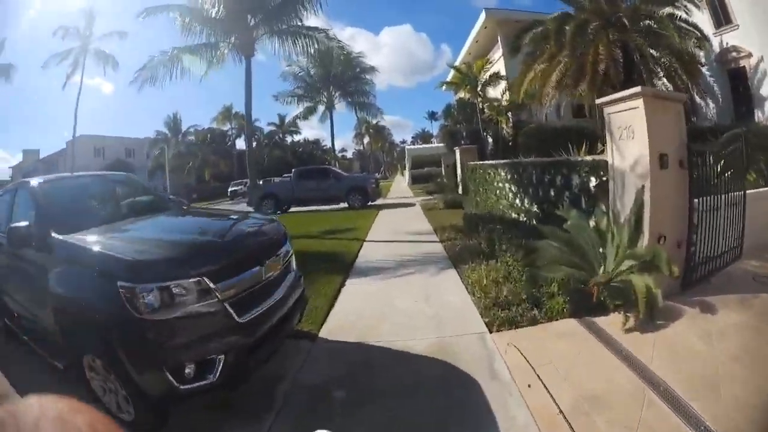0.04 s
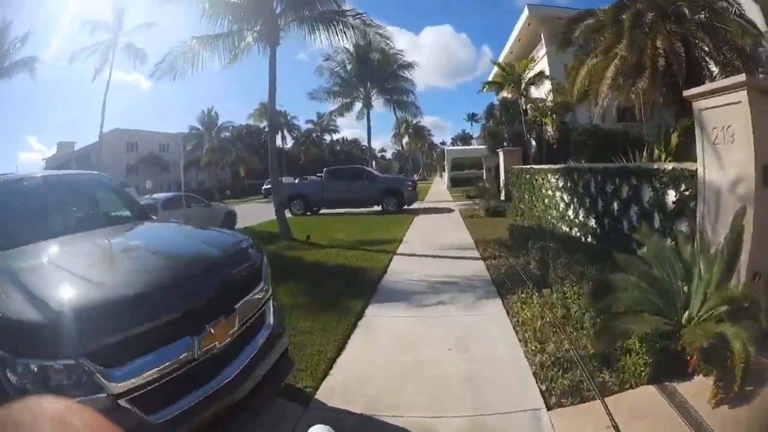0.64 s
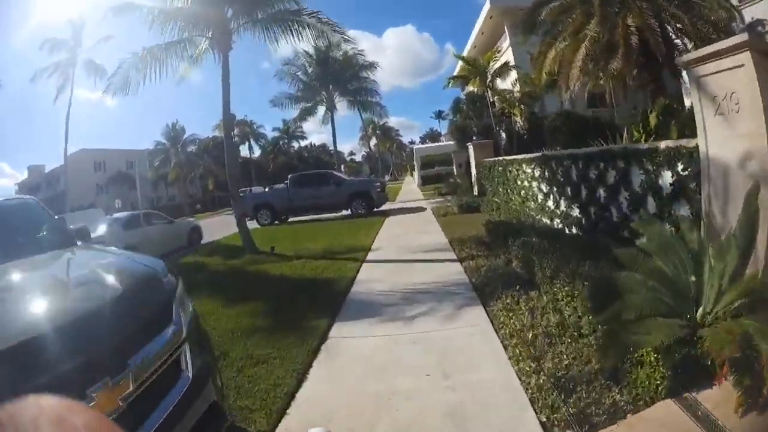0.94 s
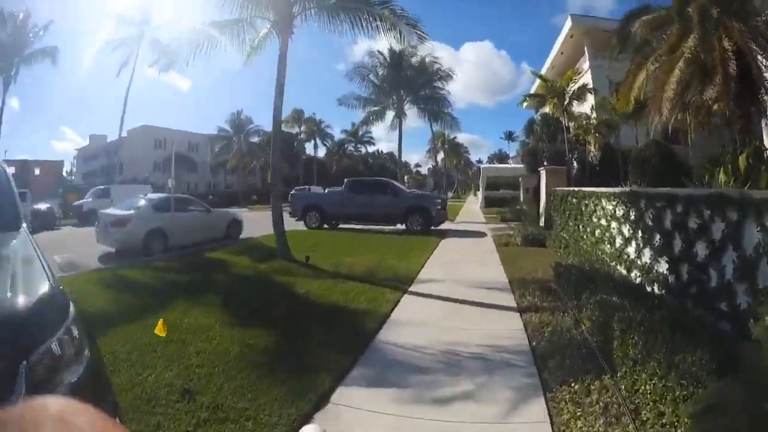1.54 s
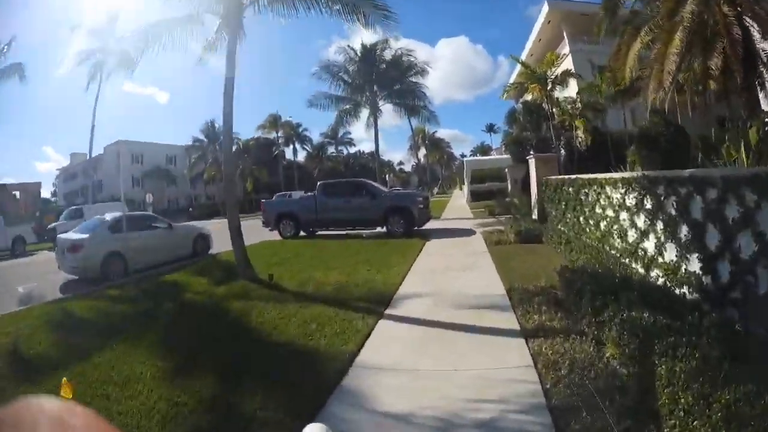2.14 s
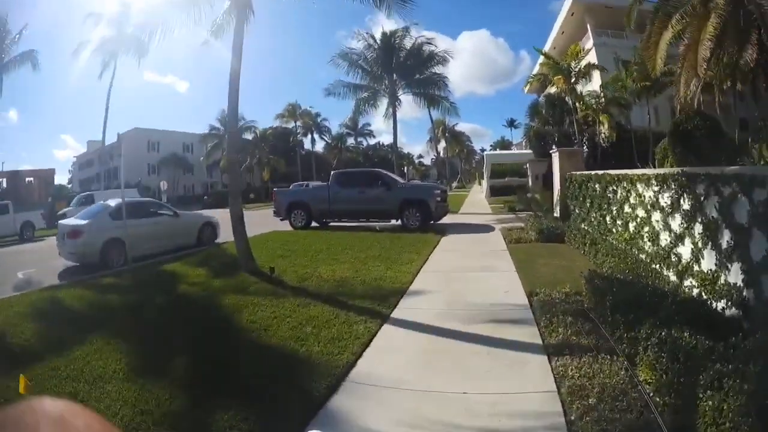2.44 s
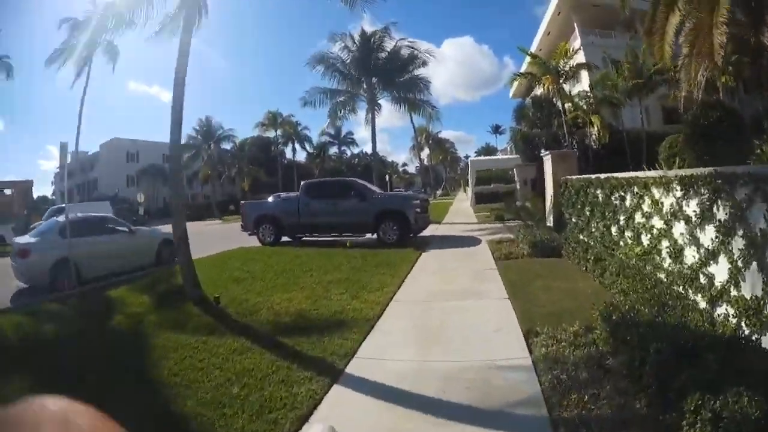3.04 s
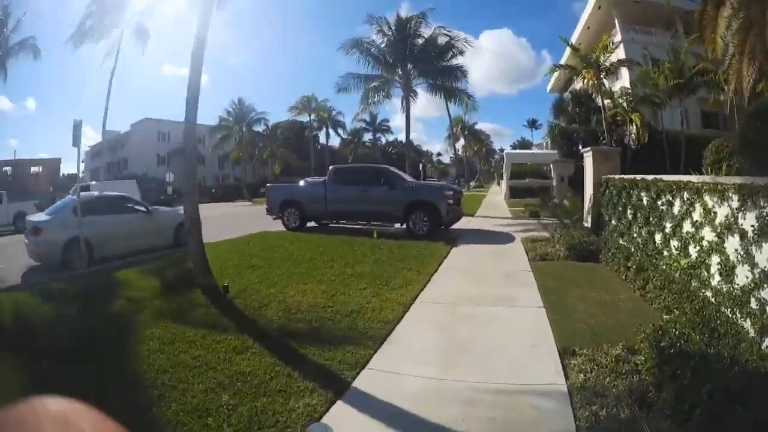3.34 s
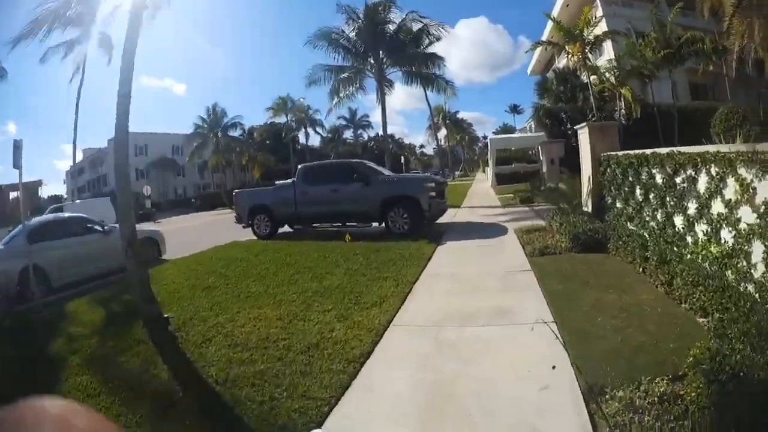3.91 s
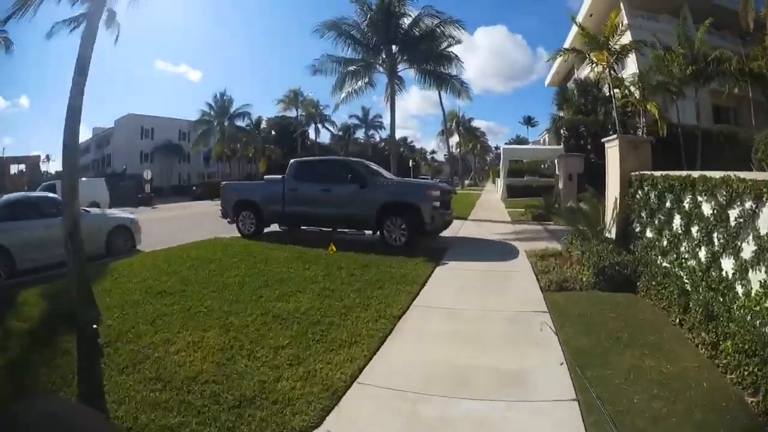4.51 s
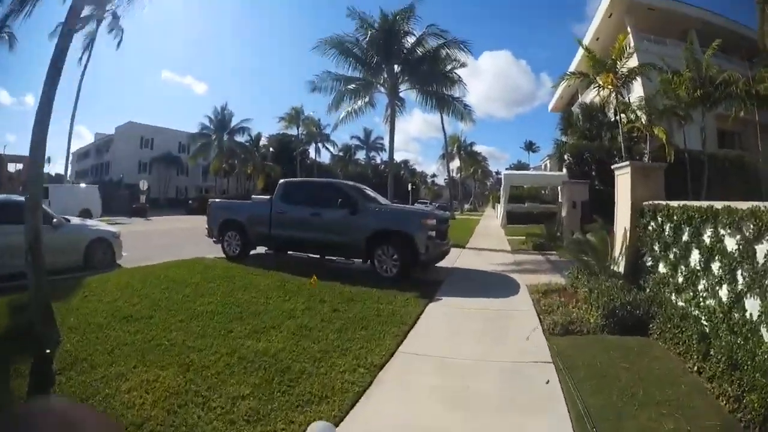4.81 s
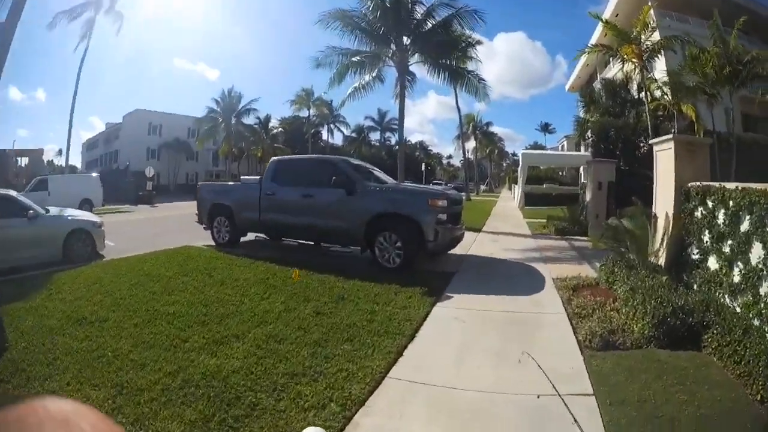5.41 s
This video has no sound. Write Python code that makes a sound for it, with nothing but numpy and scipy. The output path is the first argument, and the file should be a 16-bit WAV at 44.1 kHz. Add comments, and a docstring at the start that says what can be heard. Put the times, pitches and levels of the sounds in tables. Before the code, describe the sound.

Someone walks along a quiet sidewalk while a hanging piece of gear knocks unevenly against the camera, each tap short, hollow and very close. Small hard fittings click and bounce, and a strap swishes briefly. Three soft footfalls thump early on, and a finger creaks faintly on the housing around the middle. Faint outdoor air and microphone hiss lie underneath, with no echo.

```python
"""A hanging piece of gear knocks on a camera body as someone walks along a quiet pavement.
Each knock makes the hollow body ring briefly, and three footfalls thump softly. Small hard
fittings click and bounce, edges snap past each other, a finger sticks and slips on the housing,
and a strap swishes as it slides.
Behind it all are faint outdoor air, microphone hiss and a low hum that soon dies away."""
import sys
import numpy as np
from scipy import signal
from scipy.fft import rfft, irfft, next_fast_len
from scipy.io import wavfile
from scipy.ndimage import uniform_filter1d

SR = 44100
rng = np.random.default_rng(int(sys.argv[2]) if len(sys.argv) > 2 else 0)


def dump(signal):
    """Clip the signal to [-1, 1] and save it as 16-bit WAV at the path in sys.argv[1]."""
    limited = np.clip(np.atleast_2d(signal).T, -1, 1)
    pcm = np.round(limited * 32767).astype(np.int16)
    wavfile.write(sys.argv[1], SR, pcm)


N = 249694
TIME = np.arange(N) / SR
AGE = np.arange(int(SR / 8)) / SR  # seconds since a blow

# Knocks on the camera, and three soft, low footfall thumps (the rows with long contact).
# Each row: start in seconds, level in dB, contact time in milliseconds,
# extra dB for the hollow tones, extra dB for the wall tones.
BLOWS = [(0.0023, -12.5, 0.25, -5, -1), (0.0893, -13.5, 0.77, 3.5, -3), (0.4321, -12, 0.53, 3.5, 0),
         (0.496, -4, .12, -4, 1), (0.574, -4.5, 0.17, 4.5, 0.5), (0.692, -11, 4.5, 0, 8),
         (1.0735, -2, 0.11, 3, 0.5), (1.506, -12, 5, -2, 15), (1.703, -11, 3.6, 0, 0),
         (2.088, -3.5, 0.31, -1, 0), (2.27, -14.5, 0.53, -0.5, -4), (2.449, -17, 1.13, 2.5, 0.5),
         (2.589, -4, 0.8, 0.5, -2.5), (3.1096, -6.5, 1.18, 2, 0.5), (3.242, -10, 1.23, -1, 0.5),
         (3.5215, -11.5, 1.05, -3, -0.5), (3.5901, -19.5, 1.06, 3, 0), (3.7126, -11, 0.53, 2.5, -1),
         (4.125, -11.5, 0.43, 3.5, -1), (4.2428, -9.5, 0.53, 0.5, -1.5), (4.405, -14, 0.81, 3, -7),
         (4.5552, -7, 0.48, -1, -0.5), (4.623, -16, 0.69, 4, 0), (4.7333, -7, 0.19, 3, -0.5),
         (5.0688, -2.5, 0.16, 0, 0.5), (5.134, -6, 0.25, 4.5, 0), (5.2332, -8.5, 0.6, 3, -2)]
# The tones the body rings with. Each row: pitch in Hz, t60 (seconds to fade by 60 dB), dB at the
# left microphone, dB at the right, direction of the first swing (+1 or -1) on the left, on the right.
BODY_TONES = [(64.7, 0.14, -47, -57, -1, 1), (150, 0.11, -51.5, -54, -1, -1),
              (191, 0.09, -44, -53.5, -1, -1), (248, 0.024, -32.5, -46, -1, -1),
              (432.7, 0.047, -28.5, -22.5, -1, 1), (458.4, 0.02, -21, -31, 1, -1),
              (557, 0.044, -43, -31.5, 1, -1), (790, 0.031, -33.5, -45, -1, -1),
              (1176.6, 0.028, -19.5, -25, 1, 1), (1426, 0.017, -15.5, -26.5, -1, -1),
              (1535, 0.029, -18, -37, 1, -1), (1876, 0.044, -38.5, -33.5, -1, -1),
              (1970, 0.036, -18.5, -68, -1, -1), (2230, 0.016, -32, -30, 1, 1),
              (3500, 0.0029, -19.5, -33.5, 1, -1), (4390, 0.0081, -27, -53, -1, -1)]
def knocks_and_footfalls(detune=0.011, grip=0.18, stiffening=0.035, hollow_hz=440, wall_hz=1200,
                         travel_s=0.0001, crossing_s=0.001, damping_hz=6000):
    """Each blow rings the same body tones; a soft, long contact leaves the high ones quiet."""
    out = np.zeros((2, N))
    hz, t60, left_db, right_db, left_swing, right_swing = np.transpose(BODY_TONES)
    # low waves travel more slowly, and all must cross the body to reach the right microphone
    arrival = travel_s * np.sqrt(1000 / hz)
    hollow = np.abs(np.log2(hz / hollow_hz)) < .5
    wall = np.abs(np.log2(hz / wall_hz)) < .5
    for start, db, contact_ms, hollow_db, wall_db in BLOWS:
        scatter_db, pitch_luck, grip_luck = rng.standard_normal((3, len(hz)))
        # the grip shifts, so each tone fades a little differently from blow to blow
        fade = t60 * (1 + grip * np.tanh(grip_luck))
        push = undb(db + hollow_db * hollow + wall_db * wall + scatter_db) * contact(hz, contact_ms)
        # a harder blow raises the pitch of the low tones a little
        rise = np.where(hz < 2 * hollow_hz, 1 + stiffening * undb(db), 1)
        pitch = hz * rise * (1 + detune * pitch_luck)
        left = (push * np.sign(left_swing) * undb(left_db)) @ ring(pitch, fade, arrival)
        right = (push * np.sign(right_swing) * undb(right_db)) @ ring(pitch, fade, arrival + crossing_s)
        add(out, np.array([left, right]) + rattle(db, contact_ms), start)
    # the plastic shell swallows the treble
    return signal.sosfilt(signal.butter(6, damping_hz, fs=SR, output="sos"), out)


def contact(hz, contact_ms):
    """How much of a blow reaches a pitch: the longer the touch, the less treble."""
    return 1 / np.sqrt(1 + (hz * contact_ms / 1000) ** 4)


def rattle(db, contact_ms, chatter_hz=560, tick_ms=0.04):
    """After a blow, loose parts buzz and the mount chatters; a brief, hard contact also ticks."""
    # the buzz borrows the strap's tone colour, and the chatter that of a skin snap
    buzz = colour(rng.standard_normal((2, len(AGE))), STRAP_COLOUR) * decay(db - 45, t60=0.12)
    chatter = colour(rng.standard_normal((2, len(AGE))), np.array(SNAP_COLOUR) * [chatter_hz, 1])
    chatter *= decay(db - 44, t60=0.13) * contact(chatter_hz, contact_ms)
    tick = rng.standard_normal((2, len(AGE))) * decay(db - 33, t60=0.0025)
    return buzz + chatter + tick / (1 + (contact_ms / tick_ms) ** 2)


# Clicks of the fittings. Each row: start in seconds, level in dB, the piece's own note in Hz,
# extra dB for that note, extra dB for the crack, left minus right in dB, the crack's t60 in seconds.
CLICKS = [(0.0107, -35, 1250, 1, -1.5, -2, 0.011), (0.016, -40.5, 1740, 6, -5, 2, .015),
          (0.031, -38.5, 1660, -3, -8, 0, 0.023), (0.514, -40, 1440, -4, -8, 8, .017),
          (0.691, -47, 1520, -2, 9, 3, .012), (1.1736, -34.5, 2050, 2.5, -0.5, 3, 0.02),
          (1.5925, -50, 2060, -2, 3, 1, .01), (1.6068, -38.5, 2025, 9.5, 0, 1, .011),
          (1.7038, -48.5, 2070, 10, 16.5, 4, .007), (1.7275, -47.5, 1390, 1, 8, -2, 0.013),
          (2.0155, -42, 2050, 7, 3, -3, 0.0095), (2.0342, -37.5, 980, -8.5, 2, 1, 0.015),
          (2.039, -42.5, 2110, 1, 6, 1, 0.019), (2.1882, -39.5, 1966, 17.5, 8, -3, .018),
          (2.1897, -39.5, 2150, 11, 8, 2, .016), (2.1939, -35.5, 3500, 15, 18, 6, 0.0098),
          (2.202, -36.5, 1530, -11, -1, -4, .014), (2.206, -46.5, 3560, 19, 11, 10, .008),
          (2.254, -48, 1900, 0, 5, 3, 0.038), (2.5852, -43, 1880, 0, 4, 4, .014),
          (2.72, -43.5, 1030, -2, -16, 2, .017), (3.012, -46, 1960, 5, -14, 2, .017),
          (3.031, -49, 2050, -2, -2, 0, .02), (3.2, -41.5, 1970, 8, 1, 0, 0.012),
          (3.2103, -41, 1050, -9, 8, 3, 0.0072), (3.6253, -48.5, 3520, 7, 6, 1, .01),
          (4.0808, -47, 2070, 11.5, -15, 0, .017), (4.405, -41.5, 922, 11, 4, -3.5, 0.011),
          (4.4087, -38.5, 1500, 5, 6, 1, 0.013), (4.4735, -39.5, 900, -0.5, 0, -3, 0.013),
          (4.479, -45, 2100, -1, 4, 0, 0.012), (4.791, -47, 1080, 1, -8, -4, 0.015),
          (4.939, -49.5, 2060, 8, -9, 4, .017), (5.0813, -40, 1920, 5, 1, 0, 0.0052),
          (5.2473, -38, 3740, 7, 3, 8, .009), (5.277, -49, 1570, 0, 3, 3, 0.018),
          (5.2835, -45, 2440, -6, 6, 1, .012), (5.305, -54, 1490, -5, 0, 1, .017),
          (5.575, -49, 1460, 5, -13, -2, 0.019), (5.627, -45.5, 2920, 5, -2, -2, 0.011)]
# How well small parts send sound to the microphones. Each row: frequency in Hz, level in dB.
CLICK_COLOUR = [(100, -1), (450, 5.5), (900, 3), (2000, 3), (3800, 4.5), (6000, 1.5), (7000, -20.5),
                (7900, -50), (10500, -8), (15000, -19)]
def clicks(bounce_s=0.0083, bounce_db=-11, faint_count=8, faint_db=-52, faint_hz=2200, gain_db=-5):
    """Each listed fitting strikes and bounces twice; faint ticks fall at random in between."""
    out = np.zeros((2, N))
    for start, db, note_hz, note_db, crack_db, left_db, crack_t60 in CLICKS:
        add(out, undb(db) * pan(left_db) * click(note_hz, note_db, crack_db, crack_t60), start)
        for bounce in (1, 2):
            rebound = click(note_hz, note_db=-4, crack_db=-2, crack_t60=crack_t60)
            delay = bounce_s * (bounce + rng.random() - .5)
            add(out, undb(db + bounce * bounce_db) * pan(left_db) * rebound, start + delay)
    for when, octave in rng.random((faint_count, 2)):
        tick = click(faint_hz * 2 ** (octave - .5), note_db=0, crack_db=-2, crack_t60=.012)
        add(out, undb(faint_db) * tick, when * TIME[-1])
    return airborne(colour(out, CLICK_COLOUR)) * undb(gain_db)


# The tones heard in every click. Each row: pitch in Hz, t60 in seconds, level in dB.
SHARED_CLICK_TONES = [(1903, 0.037, -0.5), (2080, 0.047, -5.5), (2450, 0.004, 9.5), (3520, 0.0086, -11),
                      (3330, 0.02, -3.5), (3670, 0.034, -13.5), (4070, 0.022, -63), (4630, 0.015, -42),
                      (5500, 0.032, -32)]
def click(note_hz, note_db, crack_db, crack_t60, detune=0.031, scatter_db=3.5, shared_db=-2,
          overtone_ratio=2.65, attack_s=0.00038):
    """Hard parts meet: a crack, the piece's own note, and a shared ring that varies a little from click to
    click."""
    hz, t60, tone_db = np.transpose(SHARED_CLICK_TONES)
    luck = rng.standard_normal((4, len(hz)))
    gains = np.sign(luck[0]) * undb(shared_db + tone_db + scatter_db * luck[1:3])
    shared = gains @ ring(hz * (1 + detune * luck[3]), t60)
    note_t60 = min(42 / note_hz, 0.026)  # at most 42 cycles, so high notes die sooner
    # the overtone is strong only in the larger, lower pieces
    overtone = undb(-9 - 6 * np.log2(note_hz / 1000)) * ring(overtone_ratio * note_hz, note_t60)
    note = undb(note_db) * (ring(note_hz, note_t60) + overtone)
    crack = stereo_noise(len(AGE)) * decay(crack_db, crack_t60)
    # a small piece gives off little sound far below its own note
    low_cut_hz = min(0.43 * note_hz, SR / 4)
    crack = signal.sosfilt(signal.butter(2, low_cut_hz, "high", fs=SR, output="sos"), crack)
    return (shared + note + crack) * (1 - np.exp(-AGE / attack_s))


# Ticks of hard edges. Each row: start in seconds, level in dB.
EDGE_TICKS = [(2.0339, -43), (2.194, -37.5), (4.3616, -51), (4.4082, -39), (5.0745, -36), (5.0812, -48)]
# Their bright tone colour. Each row: frequency in Hz, level in dB.
EDGE_COLOUR = [(2000, -27), (4400, -10), (5400, -5), (6100, 2), (7800, -54), (9500, -19), (11700, -8),
               (15000, -12)]
def edges(t60=0.005, attack_s=0.00091, left_db=1):
    """Hard edges snap past each other with a very short, bright tick."""
    out = np.zeros((2, N))
    envelope = decay(0, t60) * (1 - np.exp(-AGE / attack_s))
    for start, db in EDGE_TICKS:
        burst = envelope * stereo_noise(len(AGE))
        add(out, colour(burst, EDGE_COLOUR) * undb(db), start)
    return out * pan(left_db)


# A finger shifting on the housing. Each row: middle in seconds, rough length in seconds, level in dB.
FINGER_SHIFTS = [(1.238, 0.033, -61), (1.847, 0.073, -60), (2.145, 0.15, -61), (2.51, 0.043, -54),
                 (2.596, 0.087, -50.5), (2.7, 0.08, -59.5), (2.892, 0.032, -53.5), (2.967, 0.046, -54),
                 (3.037, 0.055, -56), (4.83, 0.055, -58), (5.355, 0.078, -58.5), (5.485, 0.019, -56)]
# The dull tone colour of slipping skin. Each row: multiple of the slip's pitch, level in dB.
SLIP_COLOUR = [(.1, -7.5), (.3, 0.5), (.6, 7), (1, 6), (1.6, 2.5), (2.5, -19), (4.4, -4), (10, -122)]
def finger_creak(slips_per_s=150, grit=0.19, skin_hz=487, usual_pull_db=-54.5, db_per_octave=23.5):
    """Skin sticks and slips in a run of tiny thumps, higher in pitch when it pulls harder."""
    out = np.zeros((2, N))
    slips = (rng.random(N) < slips_per_s / SR) * rng.choice([-1, 1], N) * np.sqrt(SR / slips_per_s)
    force = slips + grit * rng.standard_normal((2, N))
    for middle, length, db in FINGER_SHIFTS:
        hz = skin_hz * 2 ** ((db - usual_pull_db) / db_per_octave)
        out += colour(force * swells([(middle, length, db)]), np.array(SLIP_COLOUR) * [hz, 1])
    return out


# Single snaps of the skin. Each row: middle in seconds, level in dB, pitch in Hz.
SKIN_SNAPS = [(0.13, -57, 504), (0.174, -51.5, 420), (0.987, -57, 416), (1.276, -57, 500),
              (1.288, -46, 580), (2.5, -51, 400), (2.512, -47, 580), (2.523, -54, 600), (2.5595, -47, 760),
              (2.571, -37, 530), (2.5832, -46, 510), (2.606, -51, 450), (2.622, -48, 480),
              (2.636, -46, 554), (2.659, -47.5, 484), (2.884, -47.5, 646), (2.947, -49, 407),
              (2.965, -44, 640), (3.029, -56, 560), (3.037, -40.5, 625), (5.19, -52, 447),
              (5.328, -48.5, 412), (5.345, -53.5, 328), (5.352, -48.5, 416), (5.581, -56.5, 463)]
# The tone colour of a snap. Each row: multiple of its pitch, level in dB.
SNAP_COLOUR = [(.15, -19), (.5, -4), (.8, 5), (1, 4.5), (1.5, -1.5), (2.4, -11), (4.4, -16), (10, -64)]
def finger_snaps(tear_s=0.0023, stored_s=0.0054):
    """Skin tears loose in one crisp snap, spending at once the energy of stored_s seconds of creak."""
    out = np.zeros((2, N))
    tear = np.exp(-np.abs(AGE - AGE.mean()) / tear_s)
    for middle, db, hz in SKIN_SNAPS:
        thump = colour(tear * rng.standard_normal((1, len(AGE))), np.array(SNAP_COLOUR) * [hz, 1])
        thump *= np.sqrt(SR * stored_s / np.sum(thump ** 2))
        add(out, thump * undb(db), middle - AGE.mean())
    return out


# Swishes of the strap. Each row: middle in seconds, rough length in seconds, level in dB.
SWISHES = [(0.025, 0.064, -50.5), (0.135, 0.058, -50), (0.42, 0.063, -52), (0.925, 0.084, -50.5),
           (1.14, 0.04, -49), (1.59, 0.073, -51.5), (1.8, 0.022, -48.5), (2.16, 0.021, -50),
           (2.265, 0.04, -49.5), (3.07, 0.035, -65), (3.185, 0.051, -50.5), (3.66, 0.24, -59),
           (3.82, 0.063, -57.5), (3.97, 0.095, -52.5), (4.2, 0.021, -44), (4.435, 0.03, -55),
           (5.075, 0.04, -50.5), (5.2, 0.056, -51), (5.28, 0.053, -48.5), (5.63, 0.057, -54.5)]
# The tone colour of its rubbing. Each row: frequency in Hz, level in dB.
STRAP_COLOUR = [(300, -3), (1000, -0.5), (1650, 7.5), (2000, 18.5), (2450, 8), (3700, 15.5), (4700, 5),
                (6000, 4.5), (7500, -62), (12000, -3)]
def strap(catches_per_s=220, catch_db=3.0, left_db=2.0, gain_db=-2):
    """The strap slides with the stride, its weave catching unevenly."""
    friction = colour(stereo_noise(N) / np.sqrt(2), STRAP_COLOUR)
    envelope = swells(SWISHES) * undb(gain_db + catch_db * wander(catches_per_s))
    return airborne(friction * envelope) * pan(left_db)


# Outdoor air and hiss, with a resonance near 2 kHz and a silent gap around 6.5-8.5 kHz. Each row:
# frequency in Hz, left level in dB per Hz, right level in dB per Hz, how alike the sides are (0 to 1).
AIR_AND_HISS = [(35.4, -102, -108, 0.43), (131, -101, -106, 0.02), (301, -96, -99.5, 0),
                (585, -98, -96, 0.82), (1684, -93.5, -93, 0.53), (2040, -81.5, -82.5, 0.72),
                (2175, -94, -90, 1), (4000, -85, -95, 0.22), (4420, -91, -94, 0.01),
                (6010, -93.5, -96, 0.01), (6636, -104, -105, 1), (6470, -130, -130, 1),
                (8380, -128, -128, 1), (9490, -105, -102, 0.28), (10960, -101.5, -97.5, 0),
                (15400, -100, -99, 0)]
def air(hiss_above_hz=5500):
    """A distant outdoor wash wavers in level, while the treble hiss stays steady."""
    table, size = np.array(AIR_AND_HISS), next_fast_len(N, True)
    left_db, right_db, alike = (by_band(table[:, [0, column]], size) for column in (1, 2, 3))
    alike = np.clip(alike, 0, 1)
    gain = undb([left_db, right_db]) * np.sqrt(SR / 2)
    noise = rfft(rng.standard_normal((3, size)))
    spectrum = gain * (np.sqrt(alike) * noise[2] + np.sqrt(1 - alike) * noise[:2])
    outdoor_share = 1 / (1 + (np.fft.rfftfreq(size, 1 / SR) / hiss_above_hz) ** 4)
    wash = irfft(spectrum * outdoor_share, size)[:, :N]
    hiss = irfft(spectrum * (1 - outdoor_share), size)[:, :N]
    return wash * undb(.4 * wander(3.5) + .8 * wander(18)) + hiss


def hum(hz=90, level_db=-80, waver=0.12, fade_at_s=1.84):
    """A faint low hum wavers in pitch and dies away."""
    phase = 2 * np.pi * np.cumsum(hz * (1 + waver * wander(25))) / SR
    return np.sin(phase) * undb(level_db) / (1 + (TIME / fade_at_s) ** 8)


def undb(db):
    """Turn decibels into a number to multiply by."""
    return 10 ** (np.asarray(db) / 20)


def decay(db, t60):
    """A level that starts at db and falls by 60 dB every t60 seconds."""
    return undb(db - 60 * AGE / t60)


def ring(hz, t60, arrival_s=0):
    """One fading sine wave for each tone, starting when its wave arrives."""
    age = np.maximum(AGE[:, None] - arrival_s, 0)
    return (np.sin(2 * np.pi * age * hz) * np.exp(-np.log(1000) * age / t60)).T


def swells(rows):
    """A level that rises and falls in a bell shape for each movement."""
    power = sum(undb(db) ** 2 * np.exp(-np.minimum((2 * (TIME - middle) / length) ** 2, 100))
                for middle, length, db in rows)
    return np.sqrt(power)


def wander(turns_per_s):
    """A smooth random drift, mostly between -1 and 1."""
    step = int(SR / turns_per_s)
    return uniform_filter1d(np.repeat(rng.standard_normal(N // step + 1), step), step)[:N]


def stereo_noise(size):
    """White noise that is partly the same on both sides."""
    return rng.standard_normal((2, size)) + rng.standard_normal(size)


def by_band(points, size):
    """Join (Hz, value) points into a curve over all frequencies of a sound this many samples long."""
    hz, value = np.transpose(points)
    return np.interp(np.log(np.fft.rfftfreq(size, 1 / SR) + 1), np.log(hz), value)


def colour(sound, points):
    """Shape the tone with (Hz, dB) points; white noise keeps its overall power."""
    size = next_fast_len(sound.shape[-1], True)
    gain = undb(by_band(points, size))
    return irfft(rfft(sound, size) * gain / np.sqrt(np.mean(gain ** 2)), size)[..., :sound.shape[-1]]


def pan(left_db):
    """Gains that make the left side left_db louder than the right."""
    return undb(np.array([[left_db], [-left_db]]) / 2)


def airborne(sound, lag_s=4.5e-5):
    """Sound through the air reaches the left microphone a moment after the right."""
    return np.array([np.interp(TIME - lag_s, TIME, sound[0]), sound[1]])


def add(out, sound, start_s):
    """Mix a stereo sound in at its start time."""
    first = max(int(round(start_s * SR)), 0)
    out[:, first:first + sound.shape[1]] += sound[:, :N - first]


def scene():
    """Everything is in the open, so nothing echoes."""
    impacts = knocks_and_footfalls() + clicks() + edges()
    finger = (finger_creak() + finger_snaps()) * pan(-16) * undb(-6)  # beside the right microphone
    return impacts + finger + strap() + airborne(air()) + hum()


def record(dry, low_cut_hz=46, high_cut_hz=15300):
    """The camera thins the deepest bass and cuts the top of the treble."""
    thin = signal.sosfilt(signal.butter(2, low_cut_hz, "high", fs=SR, output="sos"), dry)
    return signal.sosfilt(signal.ellip(10, .1, 70, high_cut_hz, fs=SR, output="sos"), thin)


dry = scene()
out = record(dry)
dump(out)
```